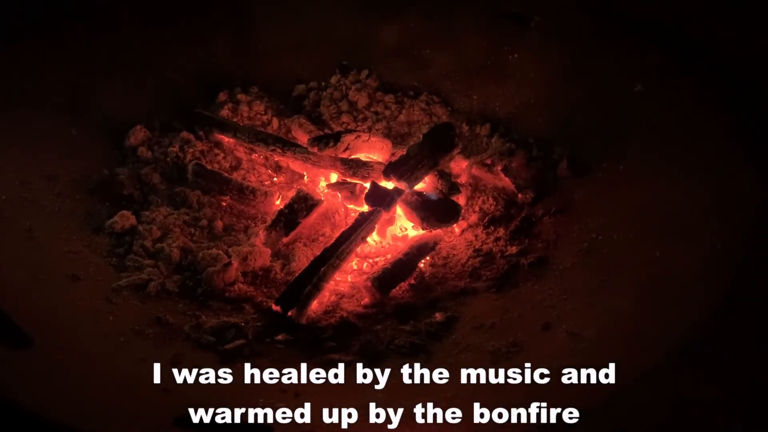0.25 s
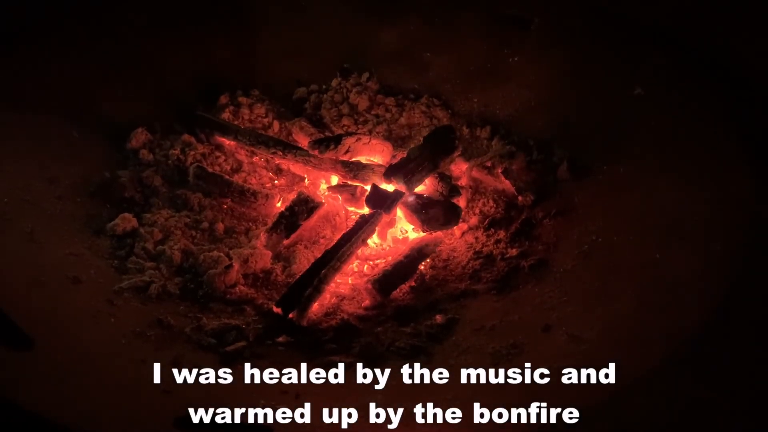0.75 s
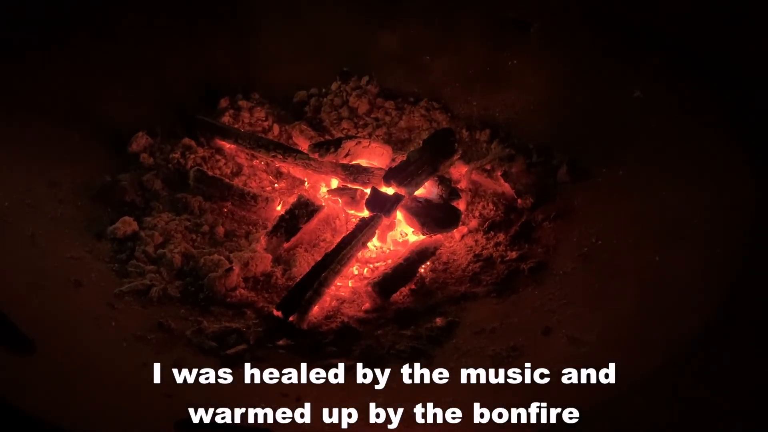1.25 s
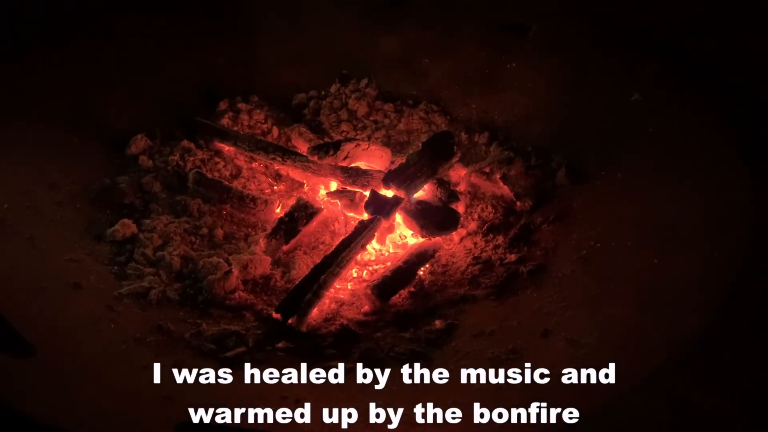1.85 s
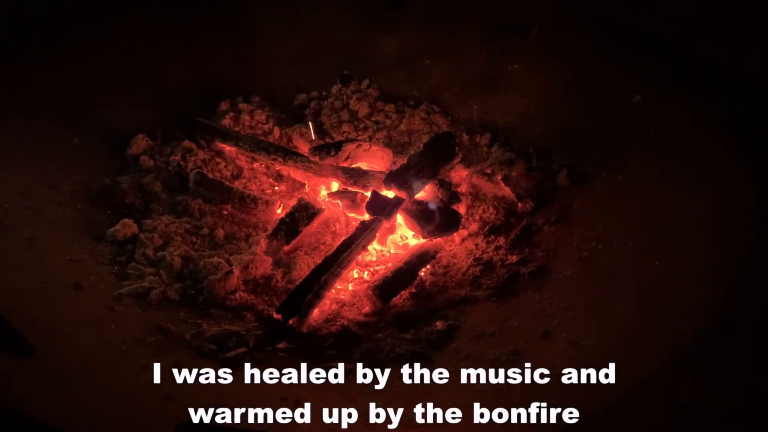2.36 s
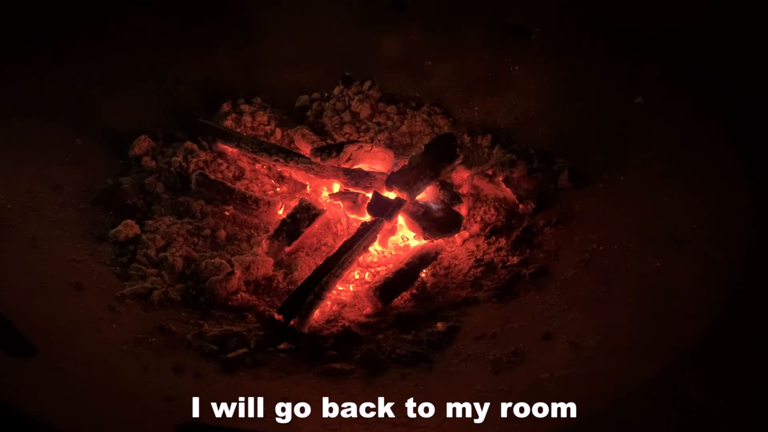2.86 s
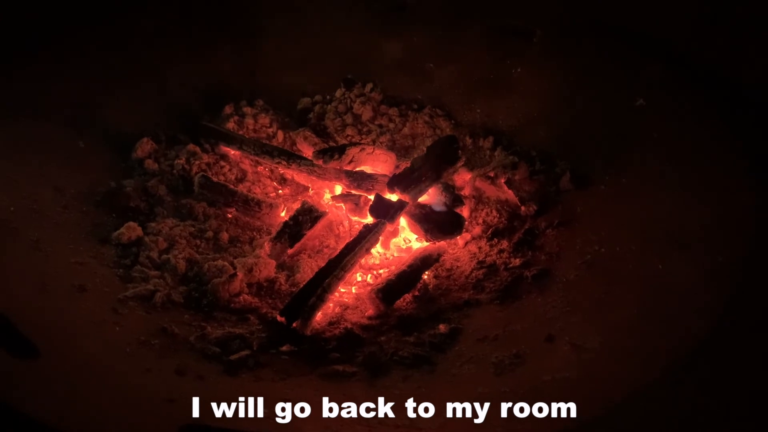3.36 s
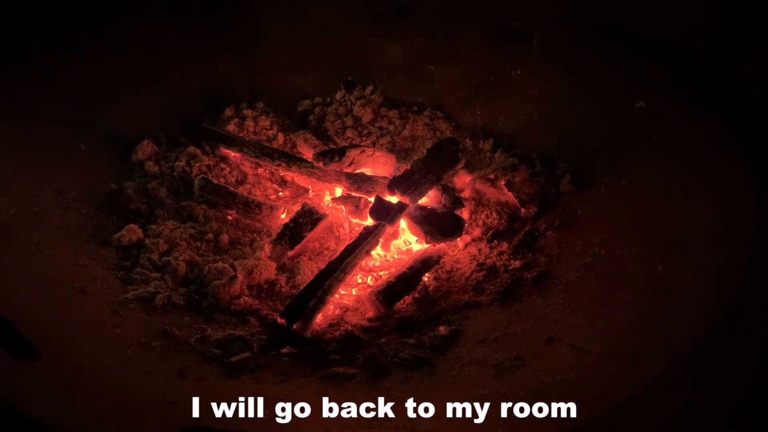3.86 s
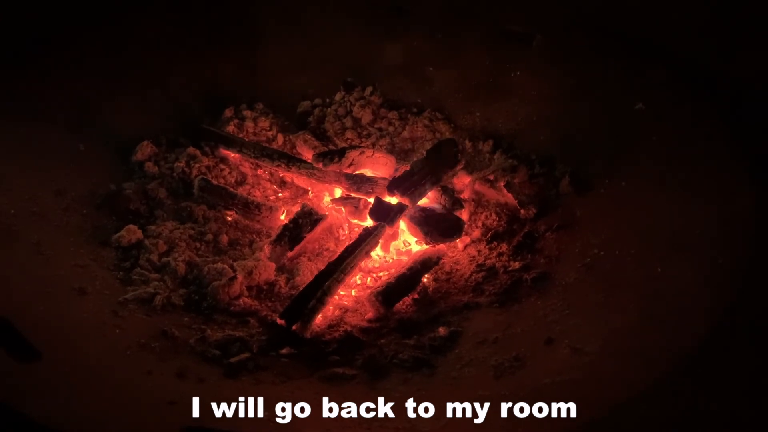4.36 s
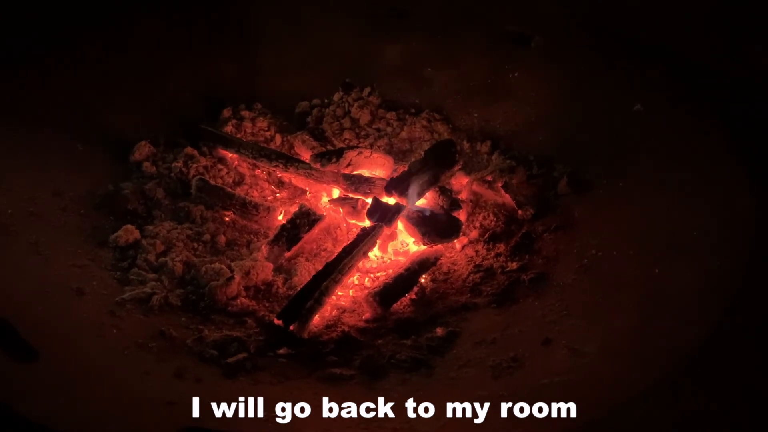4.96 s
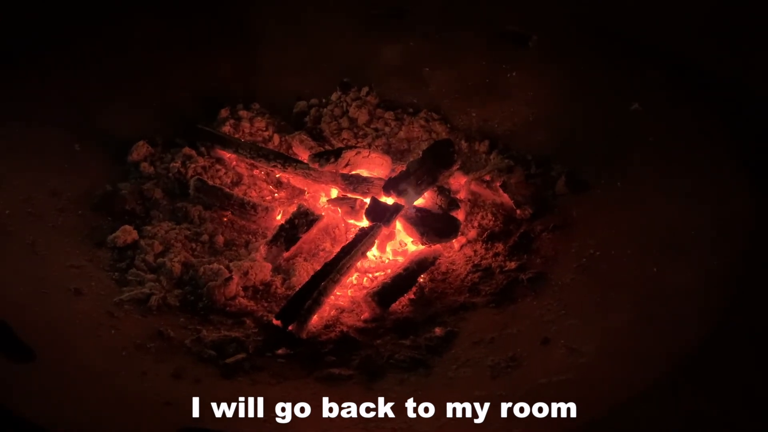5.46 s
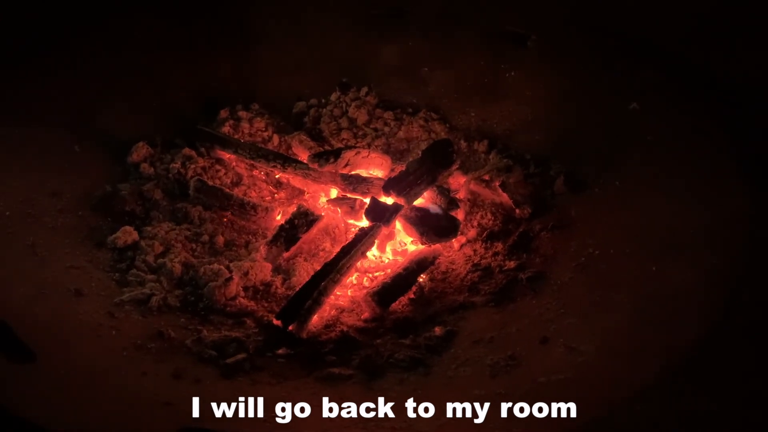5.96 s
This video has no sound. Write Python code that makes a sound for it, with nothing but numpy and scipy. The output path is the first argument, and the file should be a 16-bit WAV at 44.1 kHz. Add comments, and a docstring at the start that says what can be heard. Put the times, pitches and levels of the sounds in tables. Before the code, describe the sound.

A calm outdoor night around dying embers, heard close in wide stereo for about six seconds. A soft, even rush of air and a far fluttering cricket chorus continue throughout. One cricket trills in the centre near 4.5 kHz, swelling in during the first half second; another chirps thinly on the left, ten times a second, pausing from about 1.3 to 2.2 s. A katydid, left of centre, rasps very high and dry, six strokes a second, with brief gaps around 2.9 and 3.3 s. Tiny charcoal ticks cluster in the first half second, then scatter irregularly. At 1.16 s comes a small snap with a high steam squeak. At 2.6 s fine grains trickle down. Two loud, hard wood pops crack at 4.5 and 4.75 s, with short outdoor echoes. Sparse ticks and insects carry on to the end.

```python
"""A bed of embers glows outdoors at night: shaped noise bursts make the charcoal tick and crumble,
and three times the wood pops, answered by the surroundings. A katydid rasps at a high pitch as a row
of tooth clicks per wing stroke. One cricket trills and another chirps with gliding tones, in front of
a far chorus of fluttering noise bands and the soft rush of the night air, which is coloured noise."""
import sys
import numpy as np
from scipy import signal
from scipy.fft import rfft, irfft, next_fast_len
from scipy.io import wavfile
from scipy.ndimage import uniform_filter1d, map_coordinates

SR = 44100
rng = np.random.default_rng(int(sys.argv[2]) if len(sys.argv) > 2 else 0)


def to_wav(sig):
    """Store sig (one row per channel, or 1-D mono) as 16-bit WAV at the path in sys.argv[1].

    Samples outside -1..1 are clipped; the rate is SR.
    """
    pcm = np.clip(np.atleast_2d(sig), -1, 1) * 32767
    pcm = np.round(pcm).astype(np.int16)
    wavfile.write(sys.argv[1], SR, pcm.T)  # frames by channels


N = 273861

# Wood that bursts. Each row: start in seconds, level in dB, time the burst takes to fall 60 dB in
# seconds, echo in dB against the crack, steam squeak in dB against the crack.
POPS = [(1.1632, -26, 0.016, -17.5, 5.5), (4.4992, -10, .024, -13, -15), (4.7455, -9, 0.038, -9.5, -21)]
# Sound of a bursting pocket in the wood. Each row: frequency in Hz, strength per Hz in dB.
BURST = [(30, -36), (90, -22), (170, -8), (230, -9), (300, 1.5), (420, 0.5), (560, -10), (850, -10),
         (1200, -6), (2400, -7.5), (4000, -6), (6500, -4.5), (10000, -14), (16000, -31)]
# Sound of steam escaping through a crack. Each row: frequency in Hz, strength per Hz in dB.
SQUEAK = [(100, -33), (3700, -68), (5500, -13.5), (9900, -9.5), (10500, 2.5), (11100, -0.5), (11800, -10),
          (12800, -11), (14000, -32)]


def pops():
    """Steam bursts a pocket in the wood: a hard crack, a splintering decay, a brief squeak."""
    out = np.zeros((2, N))
    t = np.arange(SR // 20) / SR
    for s, db, t60, echo_db, squeak_db in POPS:
        force = amp(-60 * t / t60) + 0.88 * amp(-60 * t / 0.018)
        for spectrum, part_db in (BURST, 0), (SQUEAK, squeak_db):
            burst = amp(echo_db) * blow(surroundings())
            crack = blow(ports(rupture(force)))
            add(burst, 0, crack)
            add(out, s, amp(db + part_db) * blow(coloured(burst, spectrum)))
    return panned(out, left_db=-0.3)


# Charcoal that splits. Each row: start in seconds, level in dB, knock in the log in dB against the tick.
TICKS = [(.024, -34.5, -10.5), (.139, -32.5, -21), (.31, -39.5, -12), (.3303, -33.5, -15),
         (.369, -38.5, -12), (0.4332, -31.5, -22), (.507, -35, -4), (.9988, -39.5, -20), (1.4842, -40, -24),
         (2.1635, -32.5, -17), (2.583, -35.5, -20), (2.619, -36, -7), (3.111, -36, -30),
         (3.5965, -34.5, -20), (4.2975, -33, -11.5), (4.351, -29.5, -31), (4.9889, -32.5, -23),
         (5.1, -40.5, -15), (5.8968, -36.5, -17), (6.04, -41, -14)]
TICK_HZ, TICK_SPREAD = 7200, 0.057  # the charcoal's ring and its relative scatter from tick to tick


def ticks(count=50, faint_db=-51, faint_range_db=9, faint_knock_db=-20):
    """Charcoal splits in tiny bright ticks, some knocking the log; fainter ones fall at random."""
    out = np.zeros((2, N))
    t = np.arange(SR // 20) / SR
    faint = [(u * N / SR, faint_db + faint_range_db * v, faint_knock_db) for u, v in rng.random((count, 2))]
    for s, db, knock_db in TICKS + faint:
        hz = TICK_HZ * np.exp(rng.normal(0, TICK_SPREAD))
        force = amp(-60 * t / 0.002) + 0.32 * amp(-60 * t / 0.024)
        split = ports(rupture(force))
        ring = blow(resonant(resonant(split, hz, width_hz=6600), hz, width_hz=6600))
        knock = blow(resonant(coloured(split, BURST), 400, width_hz=1040))
        add(out, s, amp(db) * (ring + amp(knock_db) * knock))
    return out + amp(-10) * echo(out)


def crumble(start_s=2.62, level_db=-42.5, t60=0.27, grain_hz=6000, knock_db=-5, share=.006):
    """A little charcoal gives way and trickles down onto the wood in separate fine grains."""
    out = np.zeros((2, N))
    t = np.arange(SR // 5) / SR
    falls = rng.random(len(t)) < share  # only this share of the samples carries a grain
    grains = ports(rng.standard_normal((2, len(t))) * falls)
    hiss = unit(resonant(grains, grain_hz, width_hz=3200))
    knock = unit(resonant(grains, 1100, width_hz=920))
    add(out, start_s, amp(level_db - 60 * t / t60) * (hiss + amp(knock_db) * knock))
    return out


# The katydid's runs of evenly paced wing strokes. Each row: end of the first stroke in seconds,
# end of the last stroke in seconds, strokes a second.
STROKE_RUNS = [(.097, 2.808, 5.9), (3.02, 3.2, 6.4), (3.368, 6.186, 6.03)]
# Sound of the katydid's wing. Each row: frequency in Hz, strength in dB.
WING = [(3000, -50), (9500, -22), (11000, -10), (12100, -3.5), (12900, -6), (13900, -4), (14700, 0),
        (16000, -3), (17000, -40)]


def katydid(level_db=-51, stroke_s=.053, slowing=0.36, snap_db=-3, count=29):
    """A scraper runs over the teeth of the wing's file, slowing as it goes, and ends in a falling zip."""
    out = np.zeros((2, N))
    t = np.arange(SR // 200) / SR
    u = np.arange(count) / count  # how far along the file each tooth sits
    force = amp(-60 * t / .0018)
    for s in np.concatenate([paced(*run) for run in STROKE_RUNS]):
        to_go = 1 - (1 - slowing) * u - slowing * u ** 2
        times = s - stroke_s * to_go * rng.normal(1, .02) + rng.normal(0, .00003, count)
        # the bite grows, then eases near the end
        bite_db = np.interp(u, [0, .35, .85, 1], [-4, -1, 1, -2])
        sizes = amp(bite_db + rng.normal(0, 0.68, count))
        tooth = blow(ports(rupture(force, size=12)))  # within a stroke the teeth sound nearly alike
        for when, size in zip(times, sizes):
            scratch = blow(pair(len(t), alike=0.89) * force)
            add(out, when, size * (tooth + 0.73 * scratch))
        closing = np.minimum(t / 0.00245, 1)
        zip_hz = rng.normal(13870, 270) - 3800 * closing
        snap = np.sin(np.pi * closing) * np.sin(2 * np.pi * np.cumsum(zip_hz) / SR)
        add(out, s - .0013, amp(snap_db) * blow(snap))
    rasp = coloured(out, WING)
    return amp(level_db) * unit(panned(rasp + amp(-7) * echo(rasp), left_db=5.5))


# How the trilling cricket sings over time. Each row: time in seconds, pulses a second, level in dB.
TRILL = [(0, 58, -62), (.4, 69, -57), (0.599, 61.5, -54.5), (1.1, 61.7, -55), (1.802, 68, -56),
         (2.6, 56, -55.5), (3.6, 59.8, -56), (4.2, 60, -55.5), (6.2, 56.4, -56)]


def trilling_cricket(top_hz=4730, fall_hz=650, overtone_db=-12):
    """Each wing closure is a short tone that sags in pitch, with a weak octave."""
    s, rate, db = np.transpose(TRILL)
    t = np.arange(N) / SR
    cycle = np.cumsum(np.interp(t, s, rate)) / SR % 1
    closure = np.minimum(cycle / .58, 1)  # silent for the rest of the cycle
    pitch = top_hz - fall_hz * closure ** 2 + 50 * wobble(250)
    phase = 2 * np.pi * np.cumsum(pitch) / SR
    tone = np.sin(phase) + amp(overtone_db) * np.sin(2 * phase)
    song = panned(np.sin(np.pi * closure) * amp(1.3 * wobble(40)) * tone, left_db=0)
    return amp(np.interp(t, s, db)) * unit(song + amp(-6.5) * echo(song))


# The chirping cricket's phrases. Each row: first chirp in seconds, last chirp in seconds,
# chirps a second, top pitch in Hz, level in dB.
CHIRP_PHRASES = [(.042, 1.24, 10, 5500, -57), (2.218, 3.576, 10.3, 5340, -59.5),
                 (3.675, 6.147, 10.1, 5487, -57)]


def chirping_cricket(bend_hz=520, length_s=.034):
    """About ten thin chirps a second arch up and fall away; each phrase has its own pitch and strength."""
    out = np.zeros((2, N))
    u = np.linspace(-1, 1, int(length_s * SR))  # from start to end of a chirp
    for first_s, last_s, rate, top_hz, db in CHIRP_PHRASES:
        for s in paced(first_s, last_s, rate):
            pitch = top_hz + rng.normal(0, 20) - bend_hz * (u + 0.14) ** 2
            size = amp(db + rng.normal(0, 1.7)) * np.cos(np.pi * u / 2)
            add(out, s - length_s / 2, size * np.sin(2 * np.pi * np.cumsum(pitch) / SR))
    return panned(out + amp(-16) * echo(out), left_db=10)


# Far crickets by kind. Each row: middle pitch in Hz, width of the band in Hz, level in dB,
# pulses a second.
CHORUS = [(1810, 140, -58, 27), (1983, 255, -57, 36), (2820, 190, -65.5, 27), (4233, 600, -54.5, 52),
          (4630, 500, -57, 75)]


def chorus(depth=0.21, count=3):
    """Far crickets merge into narrow bands that flutter with the pulses of the nearest singers."""
    out = np.zeros((2, N))
    for centre, width, db, rate in CHORUS:
        band = diffuse(lambda hz: 2 ** -(2 * ((hz - centre) / width) ** 2))
        pulses = np.zeros(N)
        for _ in range(count):
            singer_rate = rate * np.exp(rng.normal(0, .2) + 0.0597 * wobble(3))
            pulses += np.sin(2 * np.pi * np.cumsum(singer_rate) / SR)
        out += amp(db + 0.26 * wobble(3.73)) * unit(band * np.exp(depth / 2 * pulses))
    return out


# Sound of the night air. Each row: frequency in Hz, strength per Hz in dB.
AIR = [(20, -23), (50, -12.5), (110, -4), (220, -4.5), (450, 0), (750, -0.5), (1250, -2), (1600, -5.5),
       (2400, -7), (3300, -10.5), (6200, -11.5), (9000, -12.5), (10500, -17), (16000, -17)]


def air(level_db=-50):
    """The soft, nearly even rush of the night: coloured noise from all around."""
    sway = amp(.4 * wobble(3))
    return amp(level_db) * sway * diffuse(lambda hz: amp(along(AIR, hz)))


# How alike left and right are. Each row: frequency in Hz, likeness from 0 (unrelated) to 1 (the same).
ALIKE = [(60, 0.99), (150, 0.51), (380, 0.65), (950, 0.53), (2380, 0.27), (5980, 0.21), (15000, 0.03)]


def diffuse(gain):
    """Stereo noise of rms 1 that arrives from all around."""
    def shape(hz):
        turn = np.arccos(np.clip(along(ALIKE, hz), -1, 1)) / 2
        return gain(hz) * np.array([np.cos(turn), np.sin(turn)])

    mid, side = filtered(rng.standard_normal((2, N)), shape)
    return unit(np.array([mid + side, mid - side]))


# How long the surroundings ring. Each row: frequency in Hz, time to fall 60 dB in seconds.
ECHO = [(100, 0.24), (350, 0.35), (1000, 0.19), (5000, 0.3), (9000, 0.27), (15000, 0.13)]


def surroundings(wall_s=0.0284, wall_db=8, build_s=0.011):
    """Scatter from ground and bushes, with a stronger return from a wall; energy 1 on the left."""
    hz, t, z = signal.stft(ports(rng.standard_normal((2, SR // 3))), SR, nperseg=256)
    fade = amp(-60 * t / along(ECHO, hz)[:, None])
    tail = signal.istft(z * fade, SR, nperseg=256)[1]
    t = np.arange(tail.shape[1]) / SR
    wall = amp(wall_db * np.exp(-((t - wall_s) / 0.0021) ** 2))
    tail *= (1 - np.exp(-t / build_s)) * wall
    return tail / np.linalg.norm(tail[0])


def echo(x):
    """The answer of the surroundings to x."""
    answer = surroundings(wall_s=0.0203, wall_db=9, build_s=0.00073)
    return signal.fftconvolve(x, answer, axes=1)[:, :N]


def rupture(force, size=24):
    """A burst of tiny fractures under the force curve, with its energy spread evenly over all pitches."""
    z = rfft(rng.standard_normal((2, len(force))) * force, 2 * len(force))
    even = z / np.sqrt(np.abs(uniform_filter1d(np.abs(z) ** 2, size)) + 1e-12)
    return irfft(even)[:, :len(force)]


def ports(x, apart_hz=1500):
    """Two unrelated signals become left and right: alike in the bass, apart in the treble."""
    side = signal.lfilter(*signal.butter(1, apart_hz, "highpass", fs=SR), x[1])
    return np.array([x[0] + side, x[0] - side])


def pair(length, alike):
    """Two white noises with the given likeness."""
    a, b = rng.standard_normal((2, length))
    turn = np.arccos(np.clip(alike, -1, 1)) / 2
    return np.array([np.cos(turn) * a + np.sin(turn) * b, np.cos(turn) * a - np.sin(turn) * b])


def panned(x, left_db):
    """x placed between the ears, left_db louder on the left than on the right."""
    return x * amp([[left_db / 2], [-left_db / 2]])


def resonant(x, hz, width_hz):
    """x through one resonance."""
    return signal.lfilter(*signal.iirpeak(hz, hz / width_hz, SR), x)


def coloured(x, spectrum, size=2048):
    """x through a filter with the given (Hz, dB) spectrum that never sounds before its input."""
    cepstrum = irfft(np.log(amp(along(spectrum, np.fft.rfftfreq(size, 1 / SR)))))
    # fold the second half onto the first, so that the filter responds as early as it can
    cepstrum[1:size // 2] *= 2
    cepstrum[size // 2 + 1:] = 0
    response = irfft(np.exp(rfft(cepstrum)))
    return signal.fftconvolve(x, response[None], axes=1)[:, :x.shape[1]]


def filtered(x, response):
    """x times a response of frequency."""
    m = next_fast_len(N + SR // 2)
    return irfft(rfft(x, m) * response(np.fft.rfftfreq(m, 1 / SR)), m)[..., :N]


def along(points, hz):
    """(Hz, value) points joined on a log axis."""
    f, v = np.transpose(points)
    return np.interp(np.log(hz + 1), np.log(f + 1), v)


def wobble(rate):
    """A smooth random curve, rate knots a second."""
    knots = rng.standard_normal(int(N * rate / SR) + 4)
    return map_coordinates(knots, [np.arange(N) * rate / SR])


def paced(first_s, last_s, rate):
    """Evenly spaced moments from the first to the last, about rate a second."""
    return np.linspace(first_s, last_s, round((last_s - first_s) * rate) + 1)


def amp(db):
    """Decibels to gain."""
    return 10 ** (np.asarray(db) / 20)


def unit(x):
    """Scaled to rms 1."""
    return x / np.sqrt(np.mean(x ** 2) + 1e-20)


def blow(x):
    """A short sound scaled to the energy of 3 ms at rms 1."""
    return x / np.sqrt(np.sum(x ** 2) / (2 * .003 * SR))


def add(track, s, x):
    """Mix x into the track at time s."""
    start = max(round(s * SR), 0)
    part = track[..., start:start + x.shape[-1]]
    part += x[..., :part.shape[-1]]


def scene():
    """The embers, the insects and the night air together."""
    embers = pops() + ticks() + crumble()
    insects = katydid() + trilling_cricket() + chirping_cricket() + chorus()
    return embers + insects + air()


def record(dry, top_hz=15900):
    """The loudest peaks are rounded off; nothing passes above top_hz."""
    rounded = dry / (1 + (dry / .9) ** 4) ** (1 / 4)
    return filtered(rounded, lambda hz: hz < top_hz)


dry = scene()
out = record(dry)
to_wav(out)
```